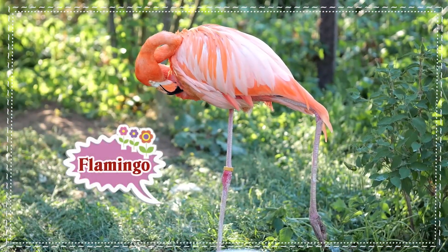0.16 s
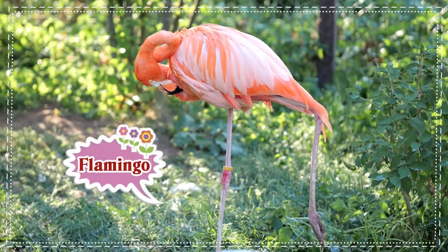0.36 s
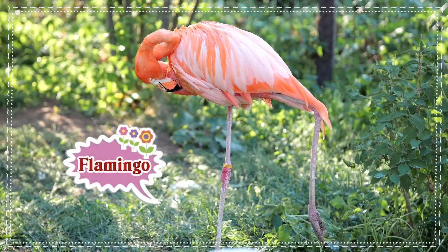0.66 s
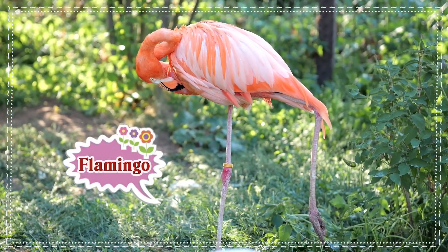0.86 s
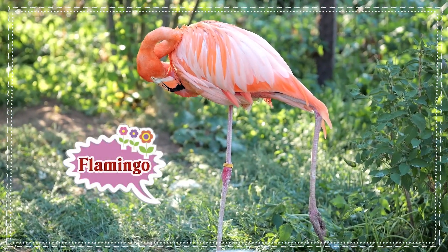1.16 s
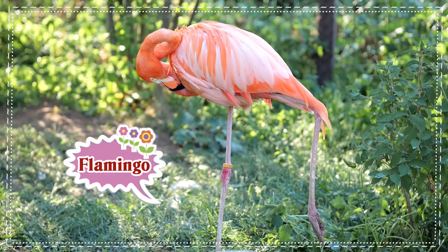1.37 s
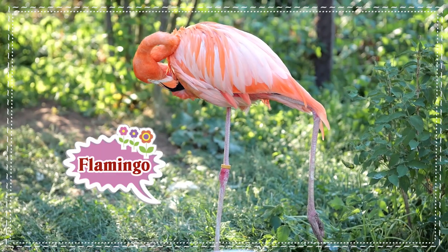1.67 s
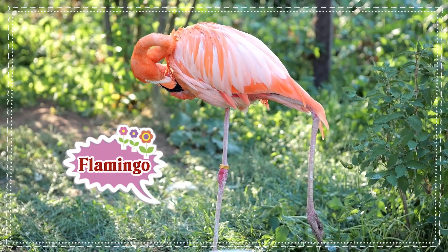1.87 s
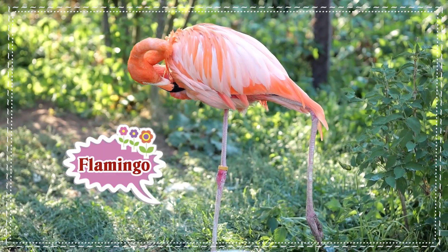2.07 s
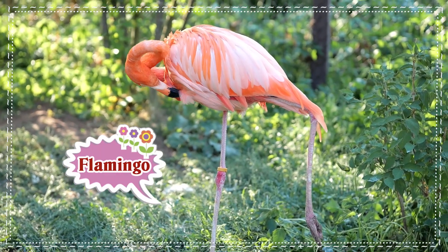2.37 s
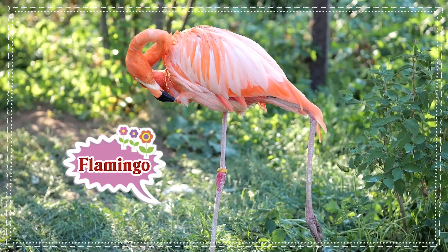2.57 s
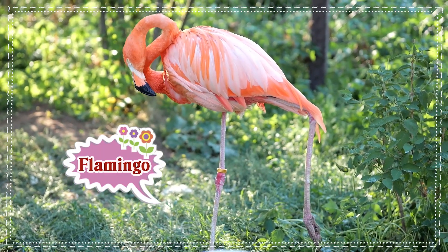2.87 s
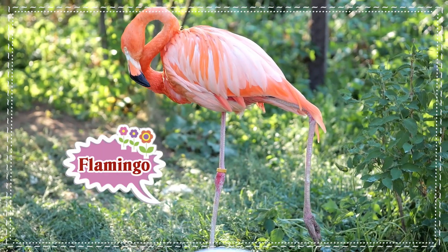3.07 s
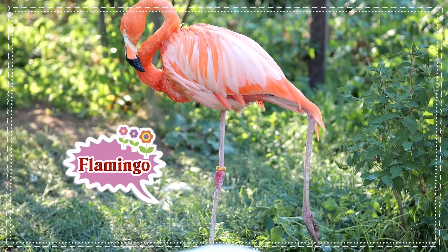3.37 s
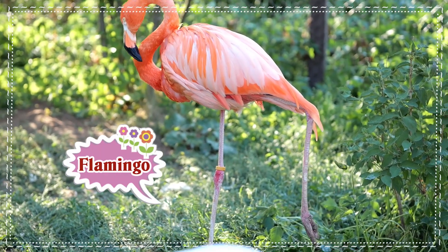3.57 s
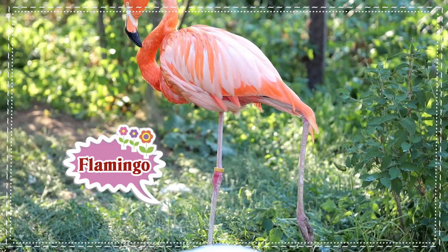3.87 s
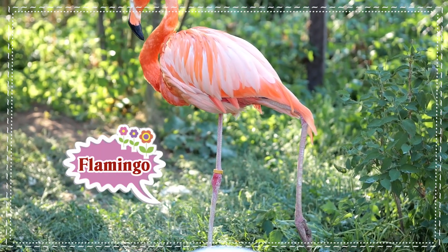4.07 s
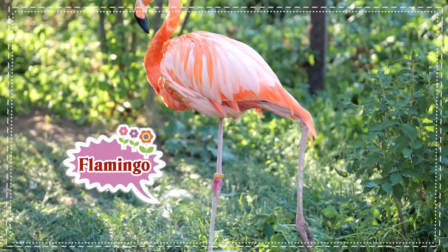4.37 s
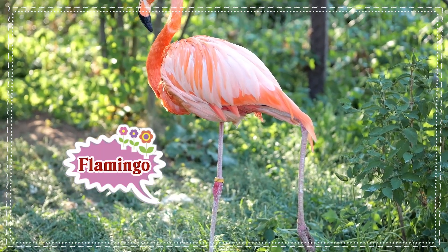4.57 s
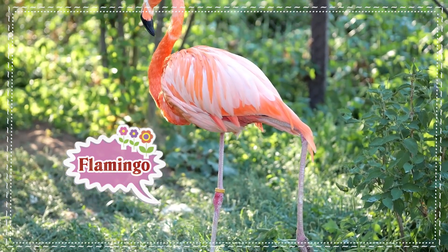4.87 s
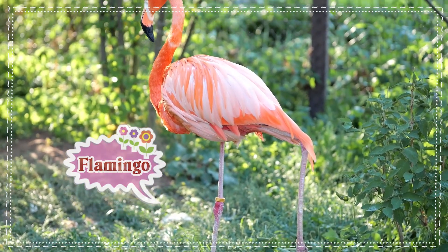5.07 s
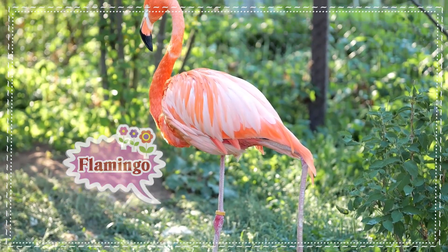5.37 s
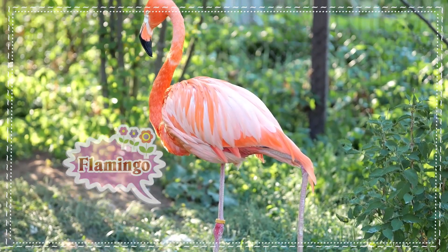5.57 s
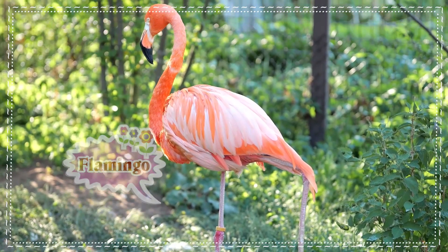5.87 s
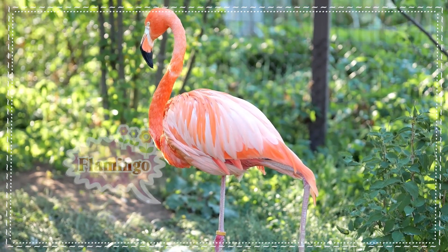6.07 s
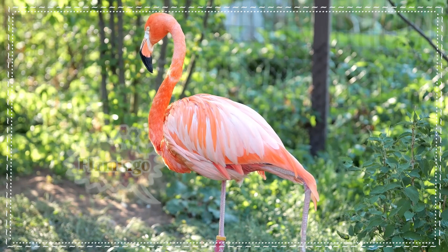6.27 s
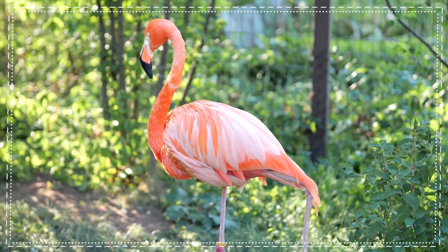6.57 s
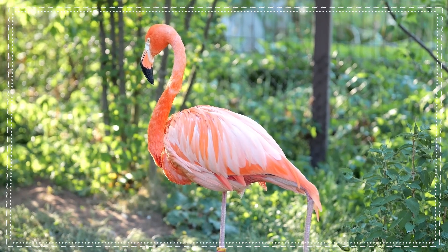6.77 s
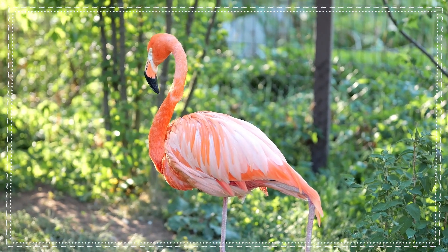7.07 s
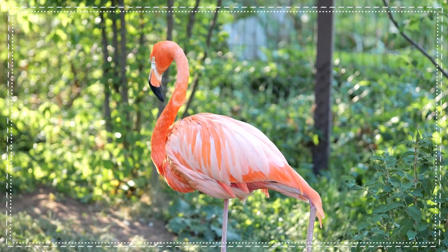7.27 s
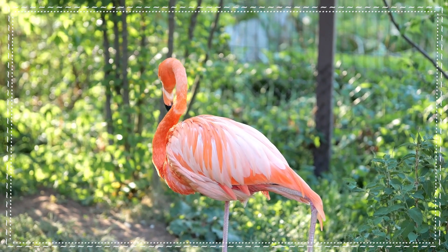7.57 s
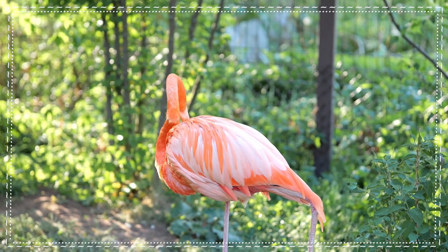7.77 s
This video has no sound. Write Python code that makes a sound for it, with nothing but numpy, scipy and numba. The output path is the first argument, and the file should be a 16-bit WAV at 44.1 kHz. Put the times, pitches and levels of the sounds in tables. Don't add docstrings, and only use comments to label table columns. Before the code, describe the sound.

A flamingo flock calls outdoors. A warbling squeal opens, then a throaty three-part honk; a second squeal and another honk follow. Midway a hoarse bird, clear whistles, toots and duller honks crowd together, then nasal brays with ringing notes. After another dull honk, hoarse and nasal voices close loudly together. Water ticks and plops over low air and distant traffic, in wide stereo with a short outdoor echo.

```python
import sys
import numpy as np
from scipy import signal
from scipy.fft import rfft, irfft, next_fast_len
from scipy.io import wavfile
from scipy.ndimage import map_coordinates
from numba import njit

SR = 44100
rng = np.random.default_rng(int(sys.argv[2]) if len(sys.argv) > 2 else 0)


def elevation(decibels):
    levels = np.asarray(decibels, float)
    return 10 ** (levels / 20)


def store_wav(level_fs):
    pcm = np.round(np.clip(np.atleast_2d(level_fs), -1, 1) * 32767)
    wavfile.write(sys.argv[1], SR, pcm.T.astype(np.int16))


N = 349272


def rms_one(x):
    return x / np.sqrt(np.mean(x ** 2) + 1e-20)


def drift(rate_hz, size):
    knots = rng.standard_normal(int(size * rate_hz / SR) + 3)
    return map_coordinates(knots, [np.arange(size) * rate_hz / SR], order=3)


def at_hz(points, hz):
    point_hz, value = np.transpose(points)
    return np.interp(np.log(hz), np.log(point_hz), value)


def place(x, pan_db):
    return x * elevation([[pan_db / 2], [-pan_db / 2]])


def unroll(rows):
    s, *columns = np.transpose(rows)
    at = np.arange(round(s[0] * SR), min(round(s[-1] * SR), N))
    fade = np.clip(np.minimum(at - at[0], at[-1] - at) / (0.002 * SR), 0, 1)
    return at, [np.interp(at / SR, s, c) for c in columns], fade


@njit
def resonate(x, turn, r):
    y = np.zeros(len(x))
    for i in range(2, len(x)):
        y[i] = x[i] - x[i - 2] + 2 * r * np.cos(turn[i]) * y[i - 1] - r * r * y[i - 2]
    return y


def resonance(x, hz, width_hz):
    turn = 2 * np.pi * hz / SR * np.ones(len(x))
    r = np.exp(-np.pi * width_hz / SR)
    return rms_one(resonate(resonate(x, turn, r), turn, r))


def effort(start, length, level_db, swell_db, attack_s, release_s, arch_db, onset_db, tail_db):
    first_db = level_db - arch_db - swell_db / 2
    last_db = level_db - arch_db + swell_db / 2
    return [(start, first_db + onset_db),
            (start + attack_s, first_db),
            (start + (length + attack_s - release_s) / 2, level_db),
            (start + length - release_s, last_db),
            (start + length, last_db + tail_db)]


def plain(table):
    share = np.array([0, 0.13, 0.77, 1])
    edge_db = np.array([-5.5, 0, 0, -5.5])
    return [np.transpose([start + length * share, hz + glide * (share - .5), level_db + edge_db])
            for start, length, hz, level_db, glide in table]


def notes(tables, partials, waver, flutter_db):
    out = np.zeros(N)
    for rows in tables:
        at, (hz, level_db), fade = unroll(rows)
        phase = 2 * np.pi * np.cumsum(hz * (1 + waver * drift(94, len(at)))) / SR
        tone = 0
        for k, db in partials:
            tone = tone + elevation(db + flutter_db * drift(62.8, len(at))) * np.sin(k * phase + k * k)
        out[at] += fade * np.sqrt(2) * elevation(level_db) * tone
    return out


# frequency_hz, level_db (per Hz)
AIR_SPECTRUM = [(15, -61), (25, -55), (70, -7), (228, -9), (254, -8.5), (370, -3.5), (585, -12),
                (688, -3.5), (1420, -8), (1720, -6.5), (2580, -10.5), (4920, -16.5), (5790, -24.5),
                (8670, -24), (15700, -46.5)]
# time_s, level_db
AIR_LOUDNESS = [(0.0, -35), (0.17, -39), (7.92, -36.5)]
# frequency_hz, likeness (0 to 1)
AIR_COHERENCE = [(50, 0.66), (150, 0.42), (600, 0.15), (3000, 0.27), (12000, 0.33)]
# frequency_hz, balance_db
AIR_PAN = [(50, -1), (150, -4), (400, -1.7), (2000, -1.1)]


def air():
    out = 0
    edges = 25 * 2 ** np.arange(0, 9.6, .5)
    white = rng.standard_normal((2, 2, N))
    for k, (low, high) in enumerate(zip(edges, edges[1:])):
        band = signal.butter(2, [low, high], "band", fs=SR, output="sos")
        mid, side = signal.sosfilt(band, white[k % 2])
        hz = np.sqrt(low * high)
        alike = np.clip(at_hz(AIR_COHERENCE, hz), 0, .99)
        gain = elevation(at_hz(AIR_SPECTRUM, hz) + 2.43 * drift(14, N) + 0.22 * drift(2.98, N))
        ears = np.sqrt(1 + alike) * mid + np.sqrt(1 - alike) * side * [[1], [-1]]
        out = out + gain * place(ears, at_hz(AIR_PAN, hz))
    s, level_db = np.transpose(AIR_LOUDNESS)
    return elevation(np.interp(np.arange(N) / SR, s, level_db) - 0.5) * rms_one(out)


def surroundings(x):
    s = np.arange(SR) / SR

    def decay(level_db, t60_s, delay_s):
        return elevation(level_db - 60 * s / t60_s) * (s > delay_s) / np.sqrt(t60_s * SR / 14)

    mid, side = rng.standard_normal((2, SR))
    scatter = (mid + 0.87 * side * [[1], [-1]]) * (decay(-10, .1, .002) + decay(-13, .5, .02))
    echoes = signal.lfilter([.5], [1, -.55], scatter)
    size = next_fast_len(N + SR)
    return irfft(rfft(x, size) * rfft(echoes, size), size)[:, :N]


def water_sprinkle():
    clicks = (rng.random(N) < 45 / SR) * elevation(-50 + 4.5 * np.minimum(rng.exponential(1, N), 3.5))
    sides = elevation(2.5 * drift(30, N) * np.array([[1], [-1]]))
    band = signal.butter(2, [1800, 9000], "band", fs=SR, output="sos")
    return sides * signal.sosfilt(band, clicks + 1e-18)


# time_s, peak_db, centre_hz
WATER_TICKS = [(0.2583, -26, 3160), (0.3294, -40, 3120), (1.1344, -21, 3310), (1.7459, -25.5, 3270),
               (2.4034, -29, 3210), (2.6314, -27, 3080), (3.056, -28, 3080), (4.019, -28, 3890),
               (5.1018, -25.5, 3130), (5.3233, -33, 4630), (5.3467, -27, 3500), (5.9309, -31, 3690),
               (5.9968, -29, 4900), (6.2048, -25, 3050), (7.3143, -27, 3600), (7.3537, -25, 3060)]
# time_s, peak_db, centre_hz
WATER_PLOPS = [
    (.478, -28, 1280),
    (1.57, -35.5, 1150),
    (2.078, -32, 1740),
    (2.825, -28, 1040),
    (3.085, -36.5, 403),
    (5.006, -34, 1770),
    (5.18, -33, 750),
    (5.238, -25.5, 1700),
    (6.96, -29, 848),
]


def water_drops():
    out = np.zeros((2, N))
    s = np.arange(1500) / SR
    for events, swell_s, sharpness, crack in ((WATER_TICKS, .0006, 1.1, .45), (WATER_PLOPS, .007, 4.5, 0)):
        for when, peak_db, hz in events:
            burst = rng.standard_normal(len(s)) * s / swell_s * np.exp(1 - s / swell_s)
            sound = resonance(burst, hz, hz / sharpness) + crack * rms_one(burst)
            sound = elevation(peak_db) * sound / np.abs(sound).max()
            at = round(when * SR)
            out[:, at:at + len(s)] += place(sound, rng.normal(-1, 1.5))
    return out


# start_s, length_s, pitch_hz, level_db, glide_hz (over the note)
SONGBIRD_CHIRPS = [
    (1.35, .025, 4930, -55, -450),
    (6.15, .065, 3970, -55, 940),
    (6.25, .04, 3325, -50.5, -50),
]


def songbird():
    return place(notes(plain(SONGBIRD_CHIRPS), [(1, 0)], waver=0.011, flutter_db=6.0), -.7)


# start_s, length_s, pitch_hz, level_db, glide_hz
FAR_LOW_NOTES = [
    (0.475, 0.052, 670, -54, -30),
    (0.53, 0.049, 714, -50.5, 70),
    (0.62, .06, 693, -51.5, 50),
]
FAR_HIGH_NOTES = [
    (1.37, .055, 967, -41.5, 0),
    (1.505, 0.061, 972, -43.5, -40),
    (2.19, 0.096, 988, -45, -6),
]
FAR_MOANS = [
    (2.75, .05, 715, -44, 0),
    (2.81, .04, 715, -44, 30),
]
# multiple (of the pitch), level_db
FAR_LOW_SPECTRUM = [(1, 11.7), (2, 4), (3, 4)]
FAR_HIGH_SPECTRUM = [(1, -0.5), (1.73, -6), (2, -1.5)]
FAR_MOAN_SPECTRUM = [(.5, -12), (1, 0)]


def far_birds():
    low = notes(plain(FAR_LOW_NOTES), FAR_LOW_SPECTRUM, waver=0.022, flutter_db=3.5)
    high = notes(plain(FAR_HIGH_NOTES), FAR_HIGH_SPECTRUM, waver=0.0041, flutter_db=4.5)
    moan = notes(plain(FAR_MOANS), FAR_MOAN_SPECTRUM, waver=0.02, flutter_db=6.5)
    return place(low, 0.86) + place(high, -.4) + place(moan, .6)


# time_s, pitch_hz, level_db
TOOT_CALL = [
    [(4.18, 600, -38), (4.215, 619, -29.5), (4.255, 626, -28.5), (4.295, 619, -29.5), (4.325, 580, -39)],
]
# start_s, length_s, pitch_hz, level_db, glide_hz
PEEP_NOTE = [
    (4.095, .06, 588, -32, -45),
]
WHISTLE_NOTES = [
    (3.885, .112, 1310, -21.5, 0),
    (3.985, .1, 1309, -33, -2),
]
RING_NOTES = [
    (3.66, 0.063, 1147, -23, -86),
    (4.33, 0.064, 1032, -22.5, -30),
    (4.515, 0.063, 1040, -22, -38),
    (5.638, 0.074, 1082, -17, -24),
    (7.155, 0.039, 1059, -24, -40),
    (7.7, 0.039, 1050, -21.5, -10),
    (5.98, 0.25, 1080, -48, 80),
]
# multiple, level_db
TOOT_SPECTRUM = [(1, -2), (2, 6), (3, -4), (4, -10), (5, -8.5), (6, -12), (7, -20), (8, -18), (9, -19.5),
                 (10, -31), (11, -25), (12, -22.5), (13, -24), (14, -32), (15, -28), (16, -27), (17, -38),
                 (18, -32), (19, -36)]
PEEP_SPECTRUM = [(1, -3), (2, 3), (3, -8), (4, -20), (5, -4), (6, -22)]
WHISTLE_SPECTRUM = [(1, 0), (2, -16)]
RING_SPECTRUM = [(1, 0), (2, -14.5)]
# start_s, length_s, pitch_hz, level_db, glide_hz
GROAN_NOTES = [
    (5.645, .09, 600, -31, -280),
    (3.71, 0.058, 810, -34, -60),
    (7.64, .08, 620, -45, -150),
    (3.86, 0.042, 900, -28.5, 27),
    (4.685, 0.059, 1490, -30, -30),
    (4.785, .055, 1470, -27.5, 10),
]


def clear_callers():
    toot = notes(TOOT_CALL, TOOT_SPECTRUM, waver=0.0053, flutter_db=2.3)
    peep = notes(plain(PEEP_NOTE), PEEP_SPECTRUM, waver=0.0035, flutter_db=2.0)
    whistle = notes(plain(WHISTLE_NOTES), WHISTLE_SPECTRUM, waver=0.0016, flutter_db=1.0)
    ring = notes(plain(RING_NOTES), RING_SPECTRUM, waver=0.0072, flutter_db=2.0)
    groan = notes(plain(GROAN_NOTES), RING_SPECTRUM, waver=0.058, flutter_db=4.5)
    return place(toot, 1.0) + place(peep, .8) + place(whistle, 1.1) + place(ring, -0.83) + place(groan, -1.5)


# start_s, length_s, level_db, swell_db
BREATH_RASPS = [
    (0.0, 0.34, -42, -10),
    (1.798, .35, -44, 3),
    (3.881, .16, -39.5, 0),
]


def breath():
    out = np.zeros(N)
    bands = [(3500, 450, -3.5), (3890, 430, -2.5), (4600, 640, -9), (7700, 2100, -18.5)]    # Hz, width Hz, dB
    for row in BREATH_RASPS:
        rows = effort(*row, attack_s=.004, release_s=.07, arch_db=1.7, onset_db=-1.5, tail_db=-11)
        at, (level_db,), fade = unroll(rows)
        hiss = rng.standard_normal(len(at))
        for hz, width_hz, db in bands:
            patches = elevation(db + 3.4 * drift(36, len(at)))
            out[at] += fade * elevation(level_db) * patches * resonance(hiss, hz, width_hz)
    return out


# time_s, pitch_hz, level_db
SQUEAL_WARBLES = [
    [(0.0, 1279, -21), (0.016, 1091, -38), (0.026, 1355, -34.5), (0.058, 1094, -26), (0.09, 1190, -27.5),
     (0.116, 1045, -25), (0.142, 1174, -28), (0.208, 960, -30.5), (0.24, 1127, -47)],
    [(1.815, 1374, -38), (1.833, 1051, -23), (1.897, 1306, -31), (1.935, 1034, -24.5), (1.953, 1208, -28),
     (1.981, 1058, -25), (2.025, 1144, -29), (2.075, 899, -34.5), (2.12, 952, -43)],
]
# start_s, length_s, pitch_hz, level_db, glide_hz
SQUEAK_NOTE = [
    (1.772, .028, 1190, -29, 342),
]
# multiple, level_db
SQUEAL_SPECTRUM = [(1, 0), (2, -23), (3, -21), (4, -31)]


def squealer():
    tables = SQUEAL_WARBLES + plain(SQUEAK_NOTE)
    voice = notes(tables, SQUEAL_SPECTRUM, waver=.042, flutter_db=2.2)
    return place(voice + breath(), 0.27)


def honks(syllables, manner, upper, rough, low_width_hz, second_width_hz, burst_s):
    out = np.zeros(N)
    (attack_s, release_s, arch_db, low_from_hz, low_to_hz,
     second_from_hz, second_to_hz, second_db, upper_db) = manner
    for start, length, level_db, swell_db, per_s in syllables:
        rows = effort(start, length, level_db, swell_db, attack_s, release_s, arch_db, onset_db=-10.5, tail_db=-11)
        at, (effort_db,), fade = unroll(rows)
        cycles = np.cumsum(per_s * (1 + .03 * drift(50, len(at)))) / SR
        whole = cycles.astype(int)
        since = (cycles % 1 - .4) / per_s
        gate = np.exp(-.5 * (since / burst_s) ** 2)
        puff_gate = np.exp(-.5 * (since / .0026) ** 2) + .4
        puff = rms_one(rng.standard_normal(len(at)) * puff_gate)
        shared_db = rng.standard_normal(60)

        def band(hz, width_hz):
            slip, detune, own_db = rng.standard_normal((3, 60))
            if width_hz > 1000:
                flutter = rms_one(gate * rng.standard_normal(len(at))) * np.sqrt(SR / 4 / width_hz)
            else:
                carrier_hz = hz + .15 * width_hz * detune[whole]
                flutter = rms_one(gate * np.sin(2 * np.pi * carrier_hz * since + .6 * slip[whole]))
            source = flutter + rough * np.sqrt(SR / 2 / width_hz) * puff
            return resonance(elevation(shared_db + own_db)[whole] * source, hz, width_hz)

        top = sum(elevation(db) * band(hz, 1.35 * width_hz) for hz, width_hz, db in upper)
        low = band(np.linspace(low_from_hz, low_to_hz, len(at)), low_width_hz)
        share = np.linspace(0, 1, len(at)) ** (0.49 if second_to_hz > second_from_hz else 1)
        second = band(second_from_hz + (second_to_hz - second_from_hz) * share, second_width_hz)
        bright = elevation(0.48 * (effort_db - level_db))
        out[at] += fade * elevation(effort_db) * (low + bright * (elevation(second_db) * second + elevation(upper_db) * top))
    return out


# start_s, length_s, level_db, swell_db (over the hold), pulse_rate_hz
HOARSE_STARTS = [
    (3.506, .095, -30, -6, 109.7),
    (7.425, .13, -29.5, -6, 100),
]
HOARSE_HONKS = [
    (3.595, 0.24, -22.5, 1.8, 110.9),
    (3.815, 0.11, -20.5, 6.2, 114.6),
    (7.535, .12, -23, 9.6, 105.2),
]
# attack_s, release_s, arch_db, low_from_hz, low_to_hz, second_from_hz, second_to_hz, second_db, upper_db
HOARSE_START_MANNER = (.004, .028, .5, 1130, 900, 2900, 2950, -5.5, -28)
HOARSE_HONK_MANNER = (0.02, 0.04, 3.5, 1133, 980, 2749.5, 2750, -2.5, -18.5)
# centre_hz, width_hz, level_db
HOARSE_THROAT = [(4280, 820, -1.5), (4630, 180, -9), (2120, 600, 7.5), (7740, 1900, -5.5),
                 (11500, 2500, -22)]


def hoarse_bird():
    out = 0
    for calls in ((HOARSE_STARTS, HOARSE_START_MANNER), (HOARSE_HONKS, HOARSE_HONK_MANNER)):
        out = out + honks(*calls, HOARSE_THROAT, rough=.7, low_width_hz=560, second_width_hz=970, burst_s=.00045)
    return place(out, 1.2)


# start_s, length_s, level_db, swell_db, pulse_rate_hz
NASAL_BRAYS = [
    (4.65, 0.21, -27, 1.8, 113.1),
]
NASAL_HOLDS = [
    (5.505, 0.22, -22.5, 4.1, 107.6),
    (7.62, 0.13, -21, 1.8, 108.5),
]
NASAL_CLIPS = [
    (5.71, 0.096, -20.5, -5.5, 111.2),
    (7.748, .105, -15.5, -1.5, 108.3),
]
NASAL_SHARPS = [
    (6.998, 0.2, -24, 2.3, 106.3),
]
# attack_s, release_s, arch_db, low_from_hz, low_to_hz, second_from_hz, second_to_hz, second_db, upper_db
NASAL_BRAY_MANNER = (0.018, 0.042, 0.74, 865, 870, 2480, 2470, 3, 0.92)
NASAL_HOLD_MANNER = (0.02, 0.07, 0.1, 860, 977, 2389, 2405, 2, -3.5)
NASAL_CLIP_MANNER = (.022, 0.06, 2, 1002, 820, 2386, 2458, -1, -5)
NASAL_SHARP_MANNER = (0, .03, 0.3, 810, 1000, 2378, 2380, 4, -4)
# centre_hz, width_hz, level_db
NASAL_THROAT = [(640, 340, -16), (1433, 350, -2.5), (1680, 150, -6.5), (3490, 740, -10.5),
                (4840, 620, -18.5), (8300, 2300, -20.5), (10900, 4400, -47)]


def nasal_bird():
    out = 0
    for calls in ((NASAL_HOLDS, NASAL_HOLD_MANNER), (NASAL_CLIPS, NASAL_CLIP_MANNER),
                  (NASAL_BRAYS, NASAL_BRAY_MANNER), (NASAL_SHARPS, NASAL_SHARP_MANNER)):
        out = out + honks(*calls, NASAL_THROAT, rough=.55, low_width_hz=620, second_width_hz=510, burst_s=.001269)
    return place(out, -2.1)


# start_s, length_s, level_db, swell_db, pulse_rate_hz
BRIGHT_STARTS = [
    (0.709, .088, -25, -4, 102.6),
    (2.293, .082, -25.5, -2.5, 99.2),
]
BRIGHT_HONKS = [
    (0.82, 0.16, -23.5, 1.2, 114.6),
    (0.995, 0.16, -24.5, .5, 109.1),
    (2.395, 0.17, -24, 2.8, 112.9),
    (2.57, .175, -24, 4.4, 109.5),
]
DULL_STARTS = [
    (4.142, .085, -24, 1, 99.4),
    (6.338, .088, -24.5, -2, 95.9),
]
DULL_HONKS = [
    (4.28, .15, -22, -4.5, 114.9),
    (4.43, .19, -23, 2, 113.1),
    (6.45, .16, -21, 3, 116.5),
    (6.62, .17, -21, 5.5, 116.5),
]
GULP_SOUNDS = [
    (4.076, 0.036, -22.5, 3, 107.8),
    (5.1, .08, -41, 2.5, 102.6),
]
# attack_s, release_s, arch_db, low_from_hz, low_to_hz, second_from_hz, second_to_hz, second_db, upper_db
BRIGHT_START_MANNER = (.003, .026, .5, 1000, 1150, 1850, 2520, -2.5, -10)
BRIGHT_HONK_MANNER = (0.0148, 0.02, 4, 1135, 1009, 2500, 2230, -1.5, -9)
DULL_START_MANNER = (.003, .024, .5, 1020, 1125, 2000, 2450, -4, -17)
DULL_HONK_MANNER = (0.0348, 0.05, 2.5, 1100, 950, 2410, 2130, -4.5, -16)
GULP_MANNER = (-0.06, -0.06, 7, 890, 760, 1200, 1800, -15, -24)
# centre_hz, width_hz, level_db
TRIPLE_THROAT = [(3170, 470, 1), (4435, 520, -5), (4940, 130, -15), (6900, 470, -33), (8100, 1400, -15.5),
                 (9700, 850, -25)]


def long_throated_bird():
    out = 0
    for calls in ((BRIGHT_STARTS, BRIGHT_START_MANNER), (BRIGHT_HONKS, BRIGHT_HONK_MANNER),
                  (DULL_STARTS, DULL_START_MANNER), (DULL_HONKS, DULL_HONK_MANNER), (GULP_SOUNDS, GULP_MANNER)):
        out = out + honks(*calls, TRIPLE_THROAT, rough=.55, low_width_hz=840, second_width_hz=490, burst_s=.0009)
    return place(out, 1.1)


def scene():
    birds = songbird() + far_birds() + clear_callers() + squealer()
    birds = birds + hoarse_bird() + nasal_bird() + long_throated_bird()
    background = air() + water_sprinkle() + water_drops()
    return background + surroundings(birds.mean(axis=0)) + elevation(-0.31) * birds


def roll_off(x):
    return signal.sosfilt(signal.butter(12, 15840, fs=SR, output="sos"), x)


def record(dry):
    rounded = np.tanh(dry / 1.1) * 1.1
    low_pass = signal.cheby2(24, 60, 15950, fs=SR, output="sos")
    mix = signal.sosfilt(low_pass, rounded)
    return roll_off(mix)


dry = scene()
out = record(dry)
store_wav(out)
```